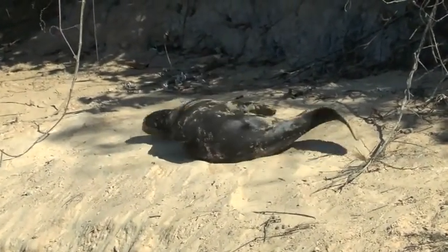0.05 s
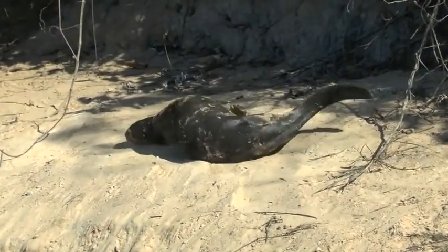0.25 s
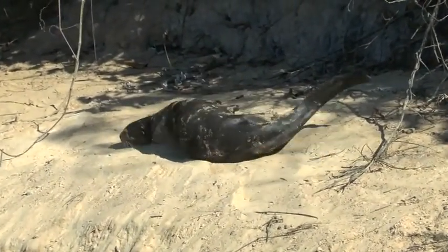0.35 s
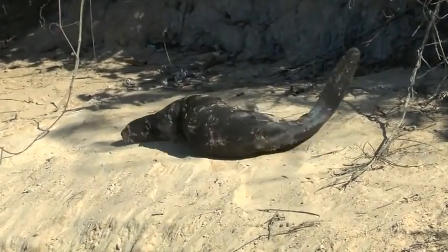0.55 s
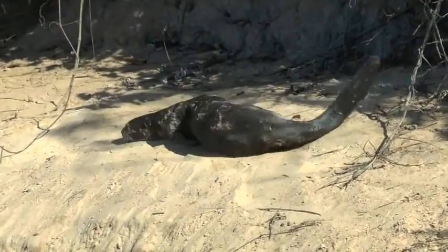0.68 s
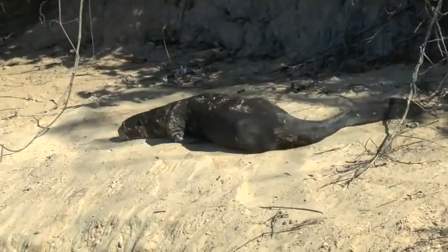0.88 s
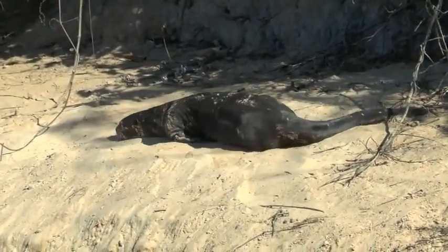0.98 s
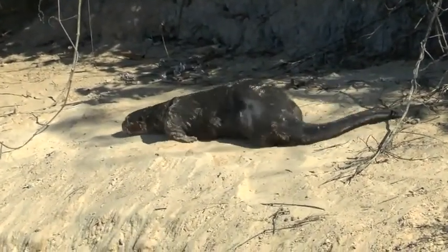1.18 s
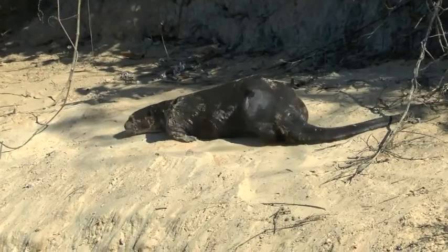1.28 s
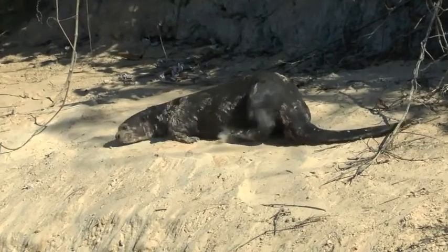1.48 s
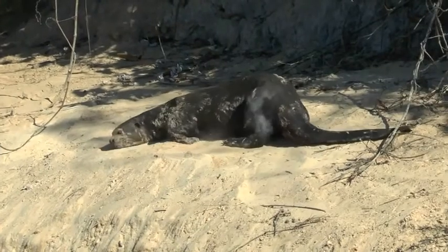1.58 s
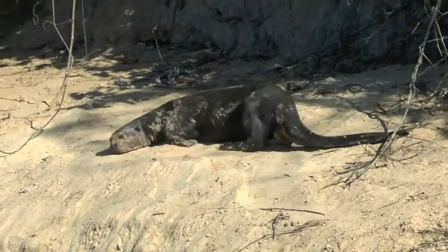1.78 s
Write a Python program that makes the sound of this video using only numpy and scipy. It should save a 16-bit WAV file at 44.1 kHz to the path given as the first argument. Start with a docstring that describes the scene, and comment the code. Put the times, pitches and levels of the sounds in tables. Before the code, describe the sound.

A reflex camera shutter fires close by: three rapid metallic clacks from about 0.22 to 0.47 seconds, with mirror slap, curtain rattle and grinding motor, then two more from 1.27 to 1.43. Short diffuse echoes follow. Between and after are faint ticks, a tiny falling chirp near 1.15 and light rustle from 1.2 to 1.5, over quiet rumble, hiss, distant insects and a thin hum.

```python
"""A reflex camera fires two short bursts, three frames then two, close by on a sandy river bank.
Its mirror, curtains and latch are rattles of tiny impacts that, with a grinding rewind motor,
ring one camera body and its low shell; fading noise makes the echoes around it.
Behind: shaped noise for low rumble and soft hiss, a narrow band of insects, a thin hum of two sines,
and a few faint ticks, a gliding chirp and a light rustle."""
import sys
import numpy as np
from scipy import signal
from scipy.fft import rfft, irfft
from scipy.io import wavfile
from scipy.ndimage import uniform_filter1d

SR = 44100
rng = np.random.default_rng(int(sys.argv[2]) if len(sys.argv) > 2 else 0)


def file_out(sig):
    """Save sig as 16-bit WAV at sys.argv[1]."""
    # one column per channel
    cols = np.atleast_2d(sig).T
    # limit, then scale
    lim = np.clip(cols, -1, 1)
    pcm = np.round(lim * 32767).astype(np.int16)
    wavfile.write(sys.argv[1], SR, pcm)


def voltage_ratio(level):
    """Linear amplitude factor for a level in decibels (scalar or array-like)."""
    return 10 ** (np.asarray(level, float) / 20)


N = 81585  # length in samples
T = np.arange(N) / SR  # time in seconds

# rumble and hiss, relative spectrum: pitch_hz, level_db (per Hz)
AIR_SPECTRUM = [(18, 4), (30, -3.5), (214, 0.5), (353, -2), (435, -2.5), (509, -9.5), (566, -3),
                (645, -15.5), (698, -6.5), (860, -17.5), (981, -21.5), (2210, -13), (6310, -20.5),
                (7200, -23.5), (15800, -30.5)]
# how much the two sides differ in the rumble and hiss: pitch_hz, side_minus_mid_db
AIR_WIDTH = [(30, 17), (60, 5.5), (200, 2), (380, 5.5), (700, 2.5), (1290, -1), (2380, -5), (4400, -10.5),
             (7300, -8), (7700, -47), (15000, -47)]
# hum tones: multiple (of the base pitch), level_db (average rms)
HUM_TONES = [(1, -76.5), (2, -77.5)]
# rewind motor grinding: start_s, length_s, level_db (before the filters)
MOTOR_RUNS = [(0.22, 0.041, -43), (0.303, 0.16, -40), (1.291, 0.0164, -38), (1.333, 0.073, -39.5)]
# strikes of each moving part: start_s, level_db (before the filters and shared level)
MIRROR_STRIKES = [(.2255, -37.5), (.229, -33), (.2335, -58), (.2405, -37), (.248, -53), (.323, -34),
                  (.3285, -36), (.343, -39), (.372, -42), (.393, -32.5), (.399, -73), (.407, -30.5),
                  (.467, -44.5), (1.2745, -36.5), (1.278, -34), (1.2835, -50.5), (1.2895, -43.5),
                  (1.296, -42.5), (1.370, -35.5), (1.42, -39.5)]
FIRST_CURTAIN_STRIKES = [(.2765, -30), (.3495, -34.5), (.421, -33), (1.3255, -31), (1.3745, -31.5)]
SECOND_CURTAIN_STRIKES = [(.292, -30), (.363, -30.5), (.4345, -30), (1.341, -31.5), (1.389, -31)]
LATCH_STRIKES = [(.3172, -34), (.389, -32), (.4602, -31.5), (1.3665, -30), (1.4142, -32)]
# how each part's strike swells and dies away: rise_s, t60_s (time to fall 60 dB)
MIRROR_SWELL = (.001, .05)
FIRST_CURTAIN_SWELL = (.004, .04)
SECOND_CURTAIN_SWELL = (.003, .045)
LATCH_SWELL = (.0005, .028)
# colour of each part's rattle: centre_hz, width_hz, treble_db (relative), thump_db (relative push on the shell)
MIRROR_COLOUR = (3289, 3018, -30, -6.5)
FIRST_CURTAIN_COLOUR = (3055, 1400, -15, -1)
SECOND_CURTAIN_COLOUR = (4010, 4500, -12.5, -9)
LATCH_COLOUR = (2391, 2405, -37, -11)
# ringing of the camera body: pitch_hz, width_hz (before damping widens it), level_db (relative)
BODY_MODES = [(1470, 26, -15), (1933, 117, 2), (2440, 29, -5), (3020, 93, 1), (3670, 210, -18),
              (4250, 104, -5.5), (4580, 150, -9), (5600, 46, -15), (6400, 34, -3), (8340, 44, -47)]
# low ringing of the camera shell: pitch_hz, width_hz, level_db (relative)
SHELL_MODES = [(571.7, 29.3, 3.5), (288.5, 33.3, -4.5), (717, 47, -10.5), (454, 102, -11.5), (135, 58, -9)]
# faint ticks and pips: start_s, level_db (of the sine), pitch_hz, t60_s
FAINT_TICKS = [(.602, -65, 2840, .04), (0.686, -62.5, 3900, 0.035), (0.729, -62, 3280, 0.064),
               (.811, -63.5, 1450, .05), (.811, -63.5, 5900, 0.036), (1.005, -62, 2430, .06),
               (1.009, -63.5, 3400, 0.054), (1.189, -62.5, 2900, 0.071), (1.656, -48.5, 274, 0.068),
               (1.721, -59.5, 2203, 0.065)]
# one gliding chirp: start_s, length_s, from_hz, to_hz, level_db
GLIDE = (1.14, .04, 5500, 3900, -71.5)
# light rustle starting just before the second burst and lasting through it: start_s, length_s, level_db
RUSTLES = [(1.18, 0.29, -64.5)]

BACKGROUND_PAN_DB = -1.5  # left minus right, for air and hum


def band(x, hz, width_hz):
    """A resonance lets one pitch region through, with gain 1 at its centre."""
    return signal.lfilter(*signal.iirpeak(hz, hz / width_hz, SR), x)


def unit(x):
    """Scale to an average strength (rms) of 1."""
    return x / np.sqrt(np.mean(x ** 2))


def walk(rate):
    """A slow random level of rms 1, made by smoothing about rate random steps per second."""
    k = int(SR / rate)
    steps = np.repeat(rng.standard_normal(N // k + 1), k)
    smooth = uniform_filter1d(uniform_filter1d(steps, k), k)
    return unit(smooth[:N])


def gate(start, length, fade):
    """On for about length seconds from start, with soft edges."""
    edges = np.minimum(T - start, start + length - T) / fade + .5
    return np.clip(edges, 0, 1) ** 2


def blow(start, rise, t60):
    """A strike swells for rise seconds, then dies away."""
    u = np.maximum(T - start, 0)
    return np.minimum(u / rise, 1) * voltage_ratio(-60 * np.maximum(u - rise, 0) / t60)


def grains():
    """Dense tiny impacts of very uneven size."""
    scatter_db = 1.6
    return unit(rng.standard_normal(N) * voltage_ratio(scatter_db * rng.exponential(size=N)))


def pan(db):
    """Gains for the two sides; db is left minus right."""
    return voltage_ratio(np.array([[db / 2], [-db / 2]]))


def air():
    """Rumble and hiss: shaped noise in half-octave bands, each flickering on its own."""
    level_db, flicker_db, mic_bass_hz = -62.5, 1.2, 67
    pan_top_hz = 3000  # the lean to the right fades out around here
    f = np.maximum(np.fft.rfftfreq(N, 1 / SR), 1)

    def on_curve(table):
        hz, db = np.array(table).T
        return np.interp(np.log(f), np.log(hz), db)

    noise = rfft(rng.standard_normal((2, N)))
    mid, side = noise * voltage_ratio(on_curve(AIR_SPECTRUM)) / (1 + (mic_bass_hz / f) ** 2)
    side = side * voltage_ratio(on_curve(AIR_WIDTH))
    both = np.array([mid + side, mid - side])
    lean = voltage_ratio(np.array([[1], [-1]]) * BACKGROUND_PAN_DB / 2 / (1 + (f / pan_top_hz) ** 4))
    out = 0
    for k in range(8, 29):  # band centres from 16 Hz to about 16 kHz
        share = np.clip(1 - np.abs(2 * np.log2(f) - k), 0, 1)
        out = out + irfft(both * lean * share, N) * voltage_ratio(flicker_db * walk(8.9))
    return out * voltage_ratio(level_db) / np.sqrt(np.mean(out.mean(0) ** 2))


def insects():
    """Distant insects: noise through two equal resonances, with a flickering level."""
    hz, width_hz, level_db, flicker_db = 7110, 720, -76.5, 1.  # width of each resonance
    x = band(band(rng.standard_normal(N), hz, width_hz), hz, width_hz)
    return unit(x) * voltage_ratio(level_db + flicker_db * walk(40.8))


def hum():
    """A thin tone and its octave, wavering a little in pitch and level."""
    base_hz, wander, flicker_db = 433, 0.0011, 1.  # wander: rms share of the pitch
    phase = 2 * np.pi * np.cumsum(base_hz * (1 + wander * walk(5.2))) / SR
    tones = sum(voltage_ratio(db + flicker_db * walk(14.8)) * np.sin(k * phase) for k, db in HUM_TONES)
    return np.sqrt(2) * tones  # a sine's peak is sqrt(2) times its rms


def motor():
    """The rewind motor grinds: runs of tiny impacts switched on and off softly."""
    fade_s = .008
    return sum(voltage_ratio(db) * gate(start, length, fade_s) for start, length, db in MOTOR_RUNS) * grains()


def part(strikes, swell, colour):
    """A moving part rattles at each strike; returns its bright sound and its push on the shell."""
    treble_hz = 7800
    hz, width_hz, treble_db, thump_db = colour
    g = grains()
    tone = unit(band(g, hz, width_hz)) + voltage_ratio(treble_db) * unit(band(g, treble_hz, treble_hz))
    envelope = sum(voltage_ratio(db) * blow(start, *swell) for start, db in strikes)
    return envelope * tone, voltage_ratio(thump_db) * envelope * g


def body(bright):
    """The camera body rings at its own pitches when the bright sound drives it."""
    damping = 3  # widens every resonance
    return unit(sum(voltage_ratio(db) * band(bright, hz, w * damping) for hz, w, db in BODY_MODES))


def shell(push):
    """The camera shell rings low when pushed; its deepest and highest parts are weakened."""
    ring = sum(voltage_ratio(db) * band(push, hz, w) for hz, w, db in SHELL_MODES)
    low_band = signal.butter(2, [91, 860], "band", fs=SR, output="sos")
    return unit(signal.sosfilt(low_band, ring))


def camera():
    """Parts and motor drive the body and the low shell; returns the clatter and the thump."""
    strike_db, body_db, thump_db = -0.5, -9, -13.5
    grind = motor()
    parts = [part(MIRROR_STRIKES, MIRROR_SWELL, MIRROR_COLOUR),
             part(FIRST_CURTAIN_STRIKES, FIRST_CURTAIN_SWELL, FIRST_CURTAIN_COLOUR),
             part(SECOND_CURTAIN_STRIKES, SECOND_CURTAIN_SWELL, SECOND_CURTAIN_COLOUR),
             part(LATCH_STRIKES, LATCH_SWELL, LATCH_COLOUR)]
    bright = voltage_ratio(strike_db) * sum(p[0] for p in parts) + band(grind, 3200, 6700)
    push = sum(p[1] for p in parts) + grind
    rms = np.sqrt(np.mean(bright ** 2))  # body and shell are set relative to this
    clatter = bright / 2 + voltage_ratio(body_db) * rms * body(bright)
    low_cut = signal.butter(2, 1600, "high", fs=SR, output="sos")
    treble_cut = signal.butter(1, 8850, fs=SR, output="sos")
    clatter = signal.sosfilt(np.vstack([low_cut, treble_cut]), clatter)
    return clatter, voltage_ratio(thump_db) * rms * shell(push)


def echo(x):
    """Scattered reflections from the surroundings: fading noise, partly different at each side."""
    t60_s, start_s, top_hz = 0.25, .005, 14300
    spread, spread_top_hz = 1, 2260  # the sides differ mostly below spread_top_hz
    t = T[:SR // 2]
    mid, side = rng.standard_normal((2, len(t)))
    side = spread * signal.lfilter(*signal.butter(2, spread_top_hz, fs=SR), side)
    tail = mid + side * np.array([[1], [-1]])
    tail = tail * voltage_ratio(-60 * t / t60_s) * (t > start_s)
    tail = signal.lfilter(*signal.butter(1, top_hz, fs=SR), tail)
    tail = tail / np.sqrt(np.sum(tail ** 2) / 2)
    return signal.fftconvolve(x[None], tail, axes=1)[:, :N]


def ticks():
    """Each faint tick is a short dying sine with some grainy noise at the same pitch."""
    rise_s, sharpness = .002, 12
    g = grains()
    out = 0
    for start, db, hz, t60 in FAINT_TICKS:
        tone = np.sin(2 * np.pi * hz * T) + .5 * unit(band(g, hz, hz / sharpness))
        out = out + voltage_ratio(db) * blow(start, rise_s, t60) * tone
    return out


def chirp():
    """A short sine whose pitch glides down evenly."""
    start, length, from_hz, to_hz, db = GLIDE
    pitch_hz = np.interp(T, [start, start + length], [from_hz, to_hz])
    return voltage_ratio(db) * gate(start, length, 0.0082) * np.sin(2 * np.pi * np.cumsum(pitch_hz) / SR)


def rustle():
    """A light rustle: tiny impacts through one broad resonance."""
    hz, fade_s = 3260, .04
    envelope = sum(voltage_ratio(db) * gate(start, length, fade_s) for start, length, db in RUSTLES)
    return envelope * unit(band(grains(), hz, hz))


def scene():
    """The camera near the centre with its echoes, over the background."""
    clatter_pan_db, thump_pan_db = -1.1, -4  # left minus right
    echo_db, thump_echo_db = -11.5, -5  # the thump echoes less than the clatter
    treble_width_db, wide_hz = -8, 7560
    background = air() + insects() + hum() * pan(BACKGROUND_PAN_DB)
    clatter, thump = camera()
    direct = clatter * pan(clatter_pan_db) + thump * pan(thump_pan_db)
    # a treble copy 40 samples late, with opposite sign at each side, makes the sides differ
    high = signal.butter(2, wide_hz, "high", fs=SR, output="sos")
    wide = signal.sosfilt(high, np.roll(clatter, shift=40)) * np.array([[1], [-1]])
    echoes = voltage_ratio(echo_db) * echo(clatter + voltage_ratio(thump_echo_db) * thump)
    small_sounds = ticks() + chirp() + rustle()
    return direct + voltage_ratio(treble_width_db) * wide + echoes + small_sounds + background


def band_limit(x):
    """A steep low-pass at the top of the band."""
    return signal.sosfilt(signal.butter(12, 15970, fs=SR, output="sos"), x)


def record(dry):
    """The recorder steeply cuts the top of the sound."""
    top_hz = 15950
    top_cut = signal.ellip(8, .2, 70, top_hz, fs=SR, output="sos")
    mix = signal.sosfilt(top_cut, dry)
    return band_limit(mix)


dry = scene()
out = record(dry)
file_out(out)
```